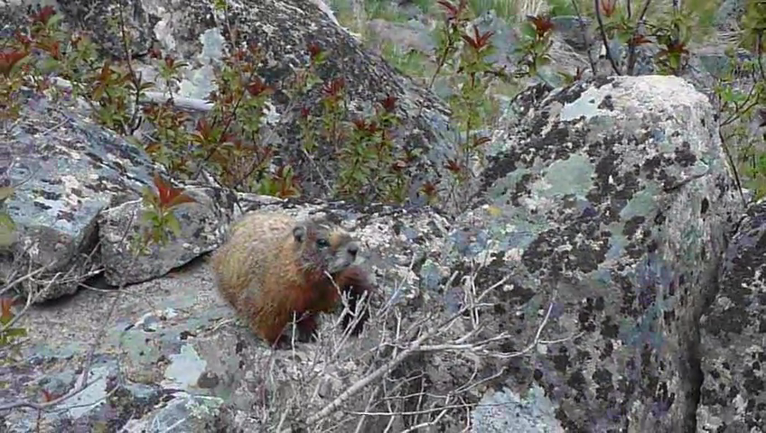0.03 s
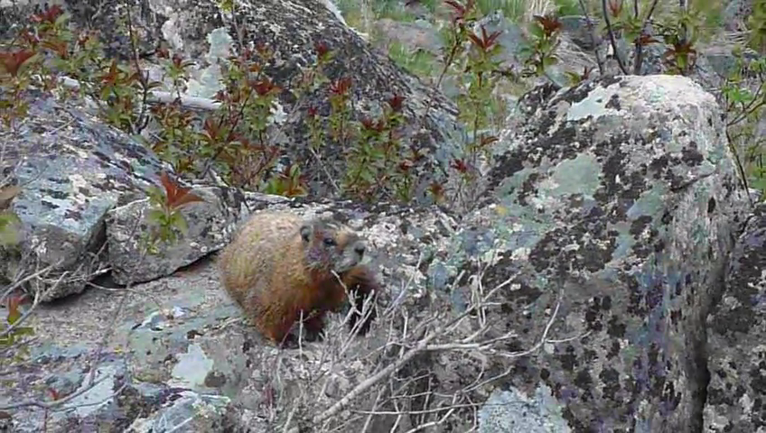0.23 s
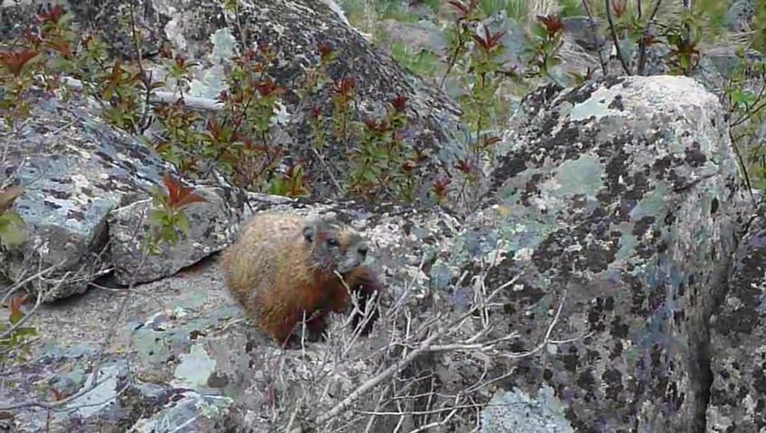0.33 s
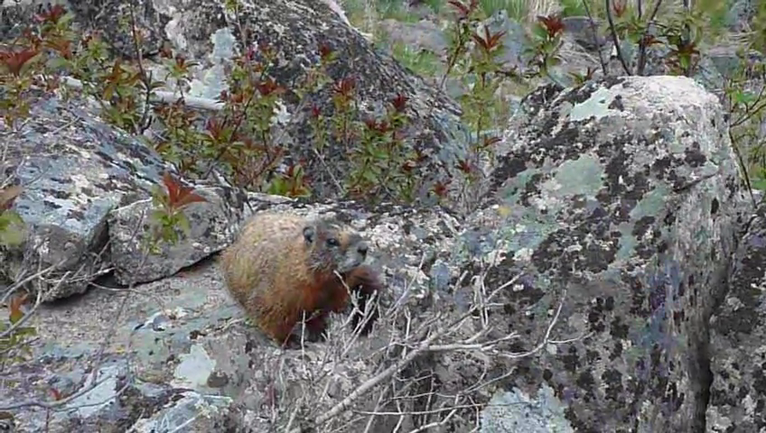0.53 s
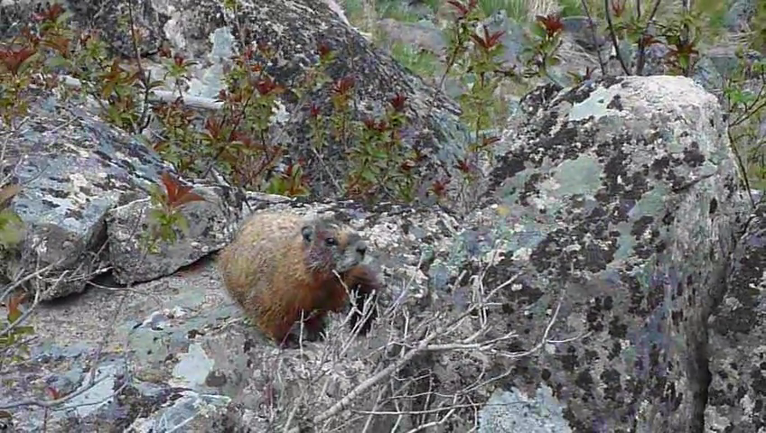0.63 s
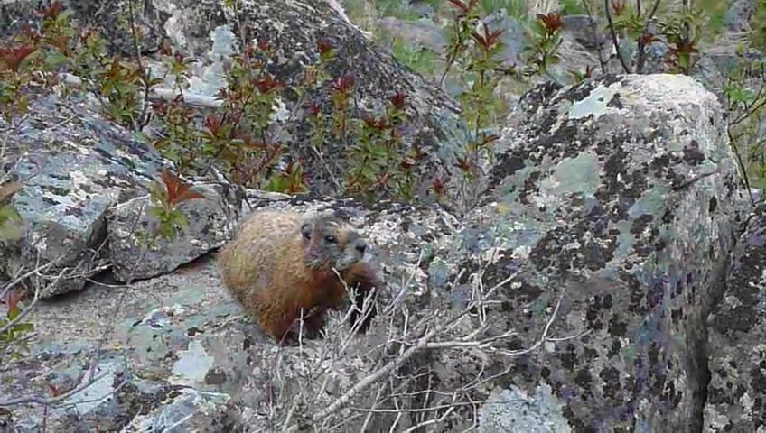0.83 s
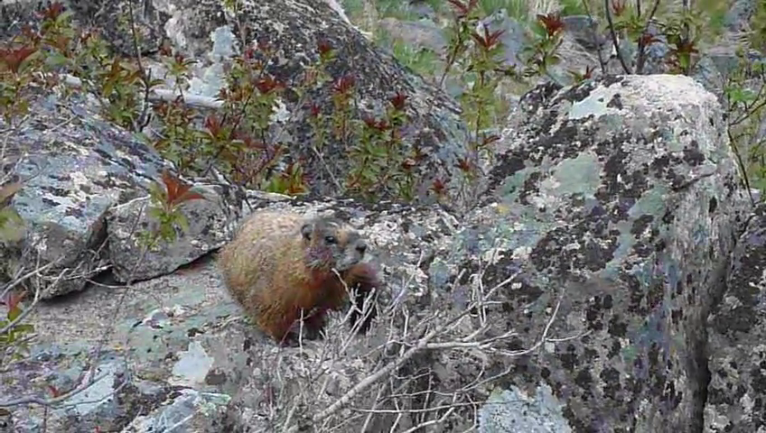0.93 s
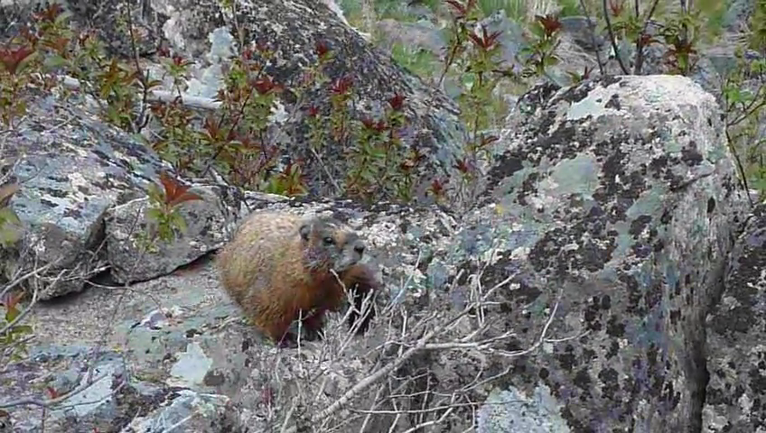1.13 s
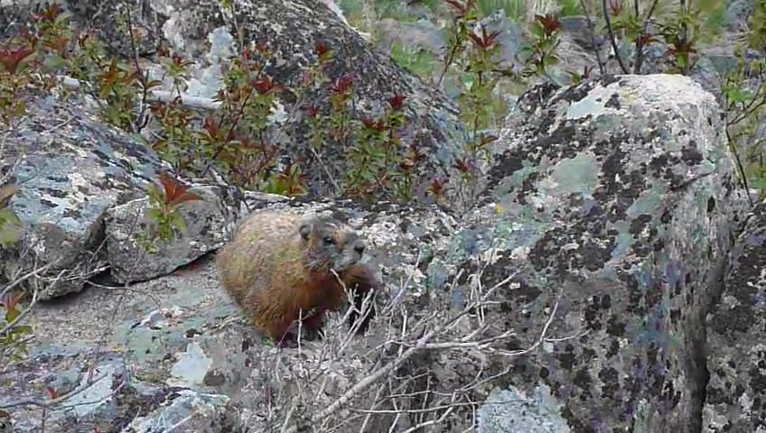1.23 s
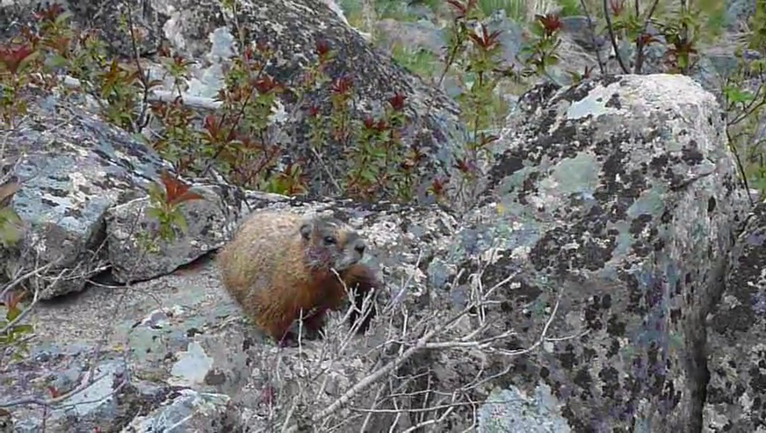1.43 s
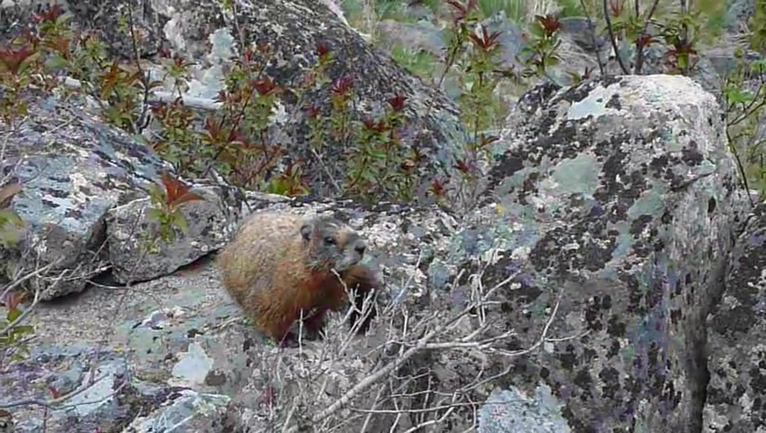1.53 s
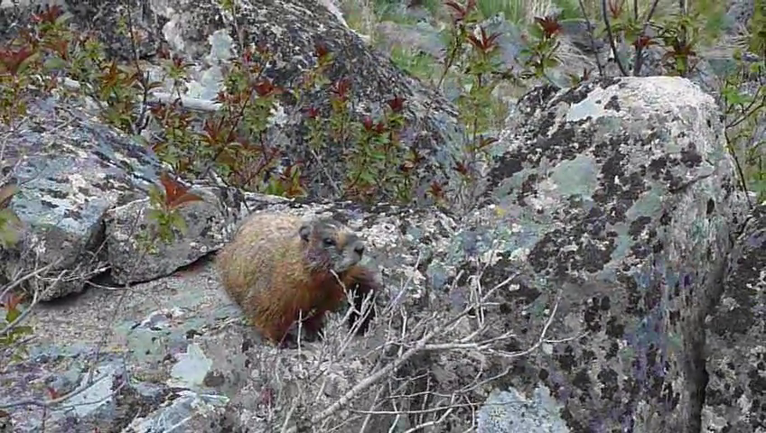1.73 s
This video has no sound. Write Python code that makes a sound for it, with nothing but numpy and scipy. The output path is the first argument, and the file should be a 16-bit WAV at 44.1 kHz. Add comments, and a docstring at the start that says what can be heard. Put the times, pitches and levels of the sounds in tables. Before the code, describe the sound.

Wind buffets the microphone with a low rumble, flutter and soft thumps, building at about 0.3 seconds and easing after 1.5, over a steady wash of air. A distant bird gives about nine quick, faint, falling chirps from the start until 0.8 seconds. A lens motor ticks and whirrs very softly throughout. Near 1.35 seconds, something small and dry, like a twig, snaps close by.

```python
"""Wind buffets a small camera's microphone on a rocky slope: gust rumble, flutter and the thumps of
single eddies over a steady wash of air. A distant songbird ends a run of down-slurred chirps, one voice
from each side of its syrinx, echoing faintly off the rocks. The lens motor whirrs and ticks softly at
a steady pace. Something small and dry, perhaps a twig, snaps close by."""
import sys
import numpy as np
from scipy import signal
from scipy.fft import rfft, irfft
from scipy.io import wavfile
from scipy.ndimage import uniform_filter1d

SR = 44100
rng = np.random.default_rng(int(sys.argv[2]) if len(sys.argv) > 2 else 0)


def waveform_to_disk(signal):
    """Save audio, clipped to [-1, 1], as 16-bit WAV at the path in sys.argv[1]."""
    frames = np.transpose(np.atleast_2d(signal))
    scaled = np.clip(frames, -1, 1) * 32767
    samples = np.round(scaled).astype(np.int16)
    wavfile.write(sys.argv[1], SR, samples)


N = 79380
CUTOFF_HZ = 8250


def amp(db):
    """dB to gain."""
    return 10 ** (np.asarray(db) / 20)


def unit(x):
    """Scale to rms 1."""
    return x / np.sqrt(np.mean(x ** 2) + 1e-20)


def add(mix, start_s, sound):
    """Mix in at start_s, cropping any overhang."""
    at = round(start_s * SR)
    sound = sound[max(-at, 0):]
    part = mix[max(at, 0):][:len(sound)]
    part += sound[:len(part)]


def colour(points, hz):
    """Gain from (Hz, dB) points, interpolated in log frequency."""
    f, db = np.transpose(points)
    return amp(np.interp(np.log(hz + 1), np.log(f + 1), db))


def noise(gain):
    """Noise of rms 1 with spectrum gain(Hz)."""
    return unit(irfft(rfft(rng.standard_normal(N)) * gain(np.fft.rfftfreq(N, 1 / SR)), N))


def drift(depth_db, rate_hz):
    """Randomly wandering gain; depth_db is rms."""
    return amp(depth_db * noise(lambda f: np.exp(-(f / rate_hz) ** 2)))


def smooth(x, samples):
    """Two-pass moving average."""
    return uniform_filter1d(uniform_filter1d(x, samples), samples)


def steadied(x, window_s=.023, share=.81):
    """Remove a share of a noise's chance swell."""
    power = smooth(x ** 2, int(window_s * SR))
    return unit(x / (abs(power) + 1e-6) ** (share / 2))


def wind():
    """Gust pressure on the microphone: lumpy rumble, with rougher flutter in the sharpest gusts."""
    # Gust pressure and flutter envelopes. Each row: time in seconds, level in dB.
    gust_levels = [(0, -38), (.06, -49), (.1, -44), (.16, -50), (.245, -38), (.29, -62), (.31, -35),
                   (.38, -32), (.42, -39), (.53, -27.5), (.61, -36), (.665, -41.5), (.695, -32.5),
                   (.815, -38), (.845, -25.5), (.93, -26.5), (1.01, -32), (1.07, -33.5), (1.18, -29.5),
                   (1.265, -40), (1.305, -25.5), (1.355, -44), (1.42, -28.5), (1.5, -40.5), (1.58, -44),
                   (1.7, -58), (1.8, -45.5)]
    flutter_levels = [(0, -49.5), (.05, -66), (.2, -64), (.295, -55.5), (.32, -42), (.36, -33.5),
                      (.4, -54.5), (.45, -45), (.49, -48.5), (.545, -36), (.59, -51.5), (.665, -55),
                      (.715, -42), (.78, -55), (.825, -48), (.86, -42), (.96, -45), (1.02, -54.5),
                      (1.07, -49), (1.1, -45), (1.13, -44.5), (1.23, -56), (1.26, -60.5), (1.318, -37),
                      (1.355, -60), (1.4, -38), (1.48, -60.5), (1.6, -62), (1.8, -81)]
    # Buffeting spectrum before the band split. Each row: frequency in Hz, relative density in dB.
    spectrum = [(20, -23.5), (32, -13.5), (45, -7), (62, -0.5), (100, 2), (165, -2.5), (240, -8.5),
                (330, -15), (450, -20.5), (600, -29.5), (900, -36), (1400, -50)]
    crossover_hz, flutter_top_hz, rumble_trim_db = 278.2, 1300, .5
    t = np.arange(N) / SR
    low_band = lambda f: 1 / np.sqrt(1 + (f / crossover_hz) ** 8)
    high_band = lambda f: np.sqrt(1 - low_band(f) ** 2) / (1 + (f / flutter_top_hz) ** 4)
    rumble = steadied(noise(lambda f: colour(spectrum, f) * low_band(f)))
    flutter = steadied(noise(lambda f: colour(spectrum, f) * high_band(f)))
    rumble = unit(rumble * drift(depth_db=2.5, rate_hz=16))
    flutter = unit(flutter * drift(depth_db=4.5, rate_hz=93))
    rumble_db = np.interp(t, *np.transpose(gust_levels)) + rumble_trim_db
    flutter_db = np.interp(t, *np.transpose(flutter_levels))
    return rumble * amp(rumble_db) + flutter * amp(flutter_db)


def air(level_db=-50.5):
    """Steady wash of distant wind and faint hiss."""
    # Wash spectrum. Each row: frequency in Hz, relative density in dB.
    spectrum = [(25, -8.5), (60, 3), (130, -4.5), (250, -19), (450, -17), (800, -20), (1400, -28),
                (2500, -33.5), (3600, -38), (5000, -39.5), (6500, -39.5), (8200, -49.5)]
    wash = noise(lambda f: colour(spectrum, f))
    return amp(level_db) * unit(wash * drift(depth_db=.9, rate_hz=23))


def voice(shape, pitch_waver=.011, shimmer_db=2.5):
    """One side of the syrinx: a gliding, wavering whistle. Returns onset offset in seconds and sound."""
    ms, hz, db = np.transpose(shape)
    knots_s = ms / 1000
    t = np.arange(knots_s[0], knots_s[-1], 1 / SR)
    waver, shimmer = unit(smooth(rng.standard_normal((2, N // 10)), samples=70))[:, :len(t)]
    pitch_hz = np.interp(t, knots_s, hz) * (1 + pitch_waver * waver)
    envelope = amp(np.interp(t, knots_s, db) + shimmer_db * shimmer) * signal.windows.tukey(len(t), .1)
    return knots_s[0], np.sqrt(2) * envelope * np.sin(2 * np.pi * np.cumsum(pitch_hz) / SR)


def bird(preroll_s=.25):
    """Swelling run of two-voiced chirps, already under way."""
    # Chirps. Each row: final down-slur time in seconds, lower voice gain in dB, upper voice gain in dB.
    chirps = [(-.003, -51.5, -64), (0.0944, -60.5, -61.5), (0.1879, -59.5, -62.5), (0.2821, -58.5, -62),
              (0.382, -58.5, -65), (0.4783, -57, -63.5), (0.5733, -54, -65.5), (0.676, -52, -63.5),
              (0.7735, -51, -60)]
    # Voice contours. Each row: time from the down-slur in ms, pitch in Hz, relative level in dB.
    lower = [(-40, 1550, -20), (-34, 1850, -13), (-31, 2500, -30), (-28, 3120, -8), (-24, 2690, -10),
             (-13, 2640, -3), (-6, 2590, 0), (-3, 2500, 0), (0, 2320, -2), (4, 2030, -8), (7, 1780, -20)]
    upper = [(-41, 3200, -16), (-33, 3780, 0), (-30, 3950, -6), (-27, 4080, -3), (-21, 3850, -6),
             (-8, 3800, -6), (-4, 3580, -6), (1, 3120, 3), (4, 2900, 0), (8, 2650, -14)]
    preroll = round(preroll_s * SR)
    out = np.zeros(preroll + N)
    for slur_s, lower_db, upper_db in chirps:
        for shape, gain_db in ((lower, lower_db), (upper, upper_db)):
            offset_s, whistle = voice(shape)
            add(out, preroll_s + slur_s + offset_s, amp(gain_db) * whistle)
    return rock_echoes(out)[preroll:]


def rock_echoes(x, echo_db=-9.5, t60_s=.65, delay_s=.005, echoes_per_s=1500):
    """Direct sound plus scatter from boulders and trees."""
    t = np.arange(SR // 2) / SR
    taps = rng.standard_normal(len(t)) * (rng.random(len(t)) < echoes_per_s / SR)
    taps *= amp(-60 * t / t60_s) * (t > delay_s)
    return x + amp(echo_db) * signal.fftconvolve(x, taps / np.linalg.norm(taps))[:len(x)]


def lens_motor():
    """Each step: faint tick, short whirr, firmer tick at the stop."""
    first_stop_s, period_s, whirr_s = .1047, .13335, .035
    ring_hz, half_width_hz, decay_s = 3280, 450, .00034
    start_db, whirr_db, stop_db = -59, -73.5, -52
    out, t = np.zeros(N), np.arange(SR // 100) / SR
    tick = np.sin(2 * np.pi * ring_hz * t) * t * np.exp(-t / decay_s)
    tick /= abs(tick).max()
    whirr = amp(whirr_db) * noise(lambda f: 1 / (1 + ((f - ring_hz) / half_width_hz) ** 4))
    for stop_s in np.arange(first_stop_s, N / SR, period_s):
        start_s = stop_s - whirr_s
        add(out, start_s, amp(rng.normal(start_db, 2)) * tick)
        add(out, start_s, whirr[round(start_s * SR):round(stop_s * SR)])
        add(out, stop_s, amp(rng.normal(stop_db, 1)) * tick)
    return out


def eddies():
    """Each eddy pushes and pulls on the microphone; smaller ones are quicker and reach higher."""
    # Pressure pulses. Each row: peak time in seconds, envelope peak in dB, centre in Hz,
    # roundness (low: sharp thump, high: brief ring).
    thumps = [(0.243, -27, 183, 2.7), (0.3075, -16, 163, 2.2), (.339, -21, 173, 3.6), (.366, -17, 150, 5.2),
              (0.371, -30.5, 335, 3.2), (.384, -18, 74.8, 1.6), (0.41, -28.5, 159, 2),
              (0.444, -23, 160.6, 2.7), (0.538, -23.5, 244, 6.4), (.550, -36, 450, 2.8),
              (.570, -24.5, 185, 6), (0.693, -20.5, 172, 2.56), (0.719, -22.5, 200, 1.95),
              (.741, -26, 213, 8.9), (.883, -27.5, 317, 1.64), (0.921, -17, 121, 2.3),
              (.956, -30.5, 333, 4.1), (1.004, -32, 237, 2.5), (1.044, -21, 284, 16.6),
              (1.067, -28, 280, 4.5), (1.069, -22.5, 70, 23), (1.08, -22.5, 234, 6.6),
              (1.119, -29.5, 299, 2.4), (1.161, -19.5, 125, 2.8), (1.173, -35.5, 260, 9),
              (1.21, -28.5, 160, 27), (1.272, -36.5, 230, 2.73), (1.299, -32, 156, 2.6),
              (1.312, -24.5, 234, 6.8), (1.322, -33, 420, 5.1), (1.425, -21.5, 124, 4.8),
              (1.468, -25, 105, 4.2)]
    out, t = np.zeros(N), np.arange(N) / SR
    for peak_s, peak_db, centre_hz, roundness in thumps:
        pulse = (1 - 2j * np.pi * centre_hz * (t - peak_s) / roundness) ** -(roundness + 1)
        phase_rad = 2 * np.pi * rng.random()
        out += amp(peak_db) * (pulse * np.exp(1j * phase_rad)).real
    return out


def snaps():
    """Two tiny dry cracks, then one sharp click with no ring."""
    # Cracks. Each row: start in seconds, peak in dB, treble tilt in dB per octave.
    cracks = [(1.283, -49.5, 15), (1.3466, -48, 10), (1.3535, -32.5, 0.5)]
    # Crack spectrum before tilt. Each row: frequency in Hz, relative level in dB.
    spectrum = [(300, -37), (900, -1.5), (1500, -2), (2800, -2), (4200, -1.5), (5400, -18.5), (6400, -9.5),
                (7300, -17), (8500, -19.5)]
    out, fft_size = np.zeros(N), 2048
    hz = abs(np.fft.fftfreq(fft_size, 1 / SR))
    for start_s, peak_db, tilt_db_per_oct in cracks:
        tilt = amp(tilt_db_per_oct * np.log2(hz / CUTOFF_HZ + .01))
        gain = colour(spectrum, hz) * tilt / (1 + (hz / CUTOFF_HZ) ** 10)
        minimum_phase = np.exp(np.conj(signal.hilbert(np.log(gain))))  # energy packed at the onset
        click = np.fft.ifft(minimum_phase).real[:fft_size // 4]
        add(out, start_s, amp(peak_db) * click / abs(click).max())
    return out


def scene():
    """Mono mix: wind on the microphone, bird far behind it."""
    return (wind() + eddies() + air() + bird() + lens_motor() + snaps())[None]


def record(dry):
    """Camera response: narrow treble notch, then low-pass."""
    notch_hz = 5450
    notched = signal.lfilter(*signal.iirnotch(notch_hz, Q=9, fs=SR), dry)
    lowpass = signal.firwin(401, CUTOFF_HZ, window=("kaiser", 8), fs=SR)
    return signal.oaconvolve(notched, lowpass[None], "same")


dry = scene()
out = record(dry)
waveform_to_disk(out)
```